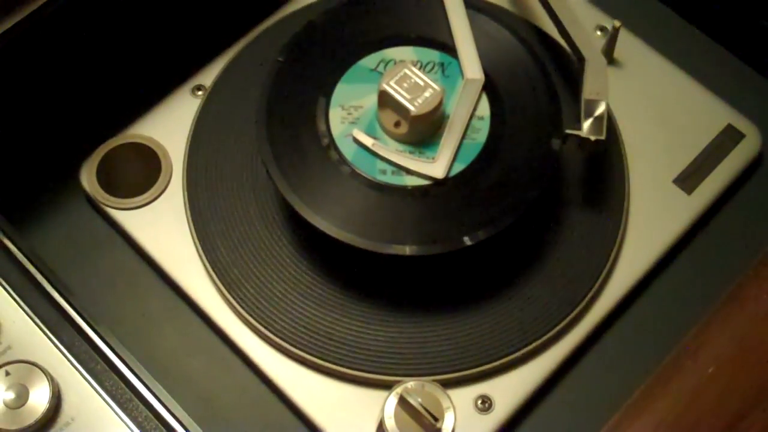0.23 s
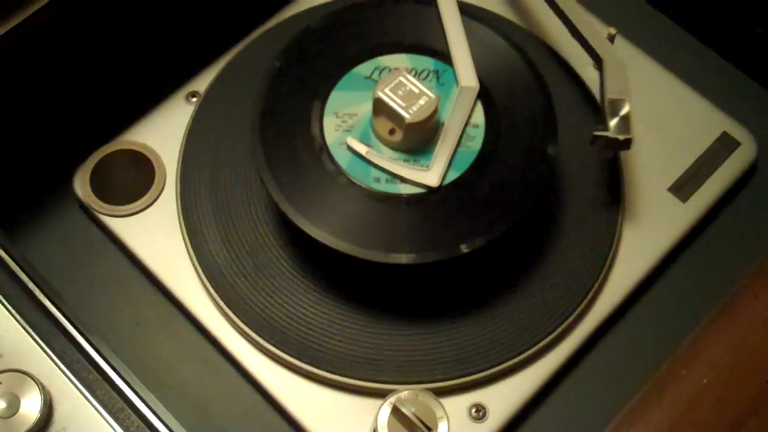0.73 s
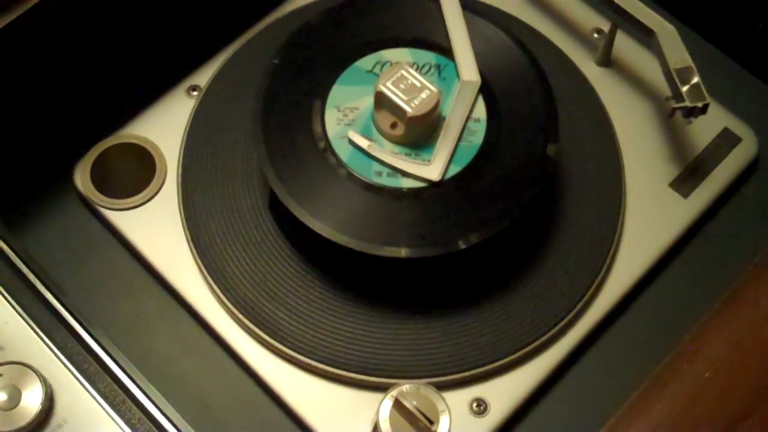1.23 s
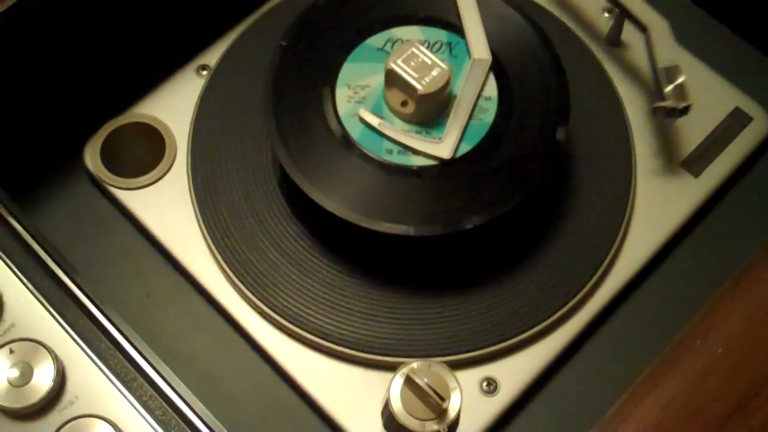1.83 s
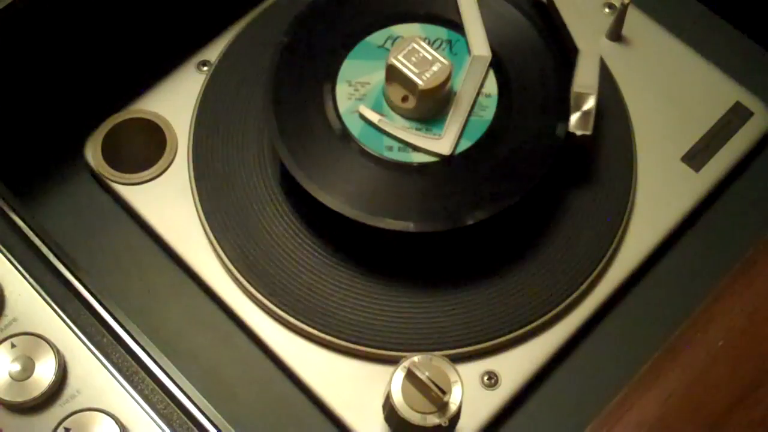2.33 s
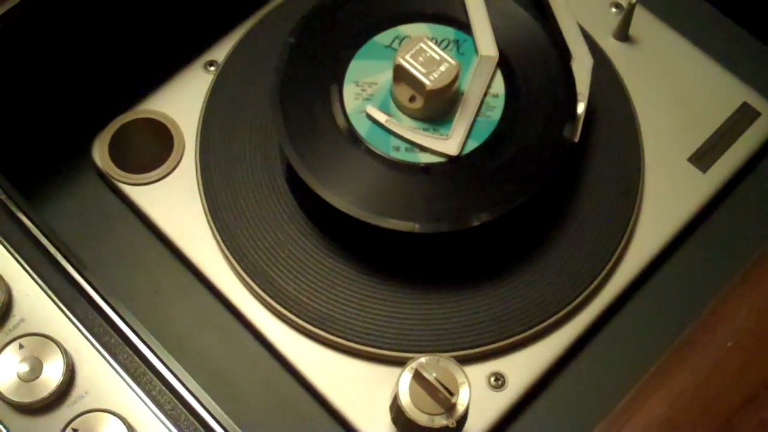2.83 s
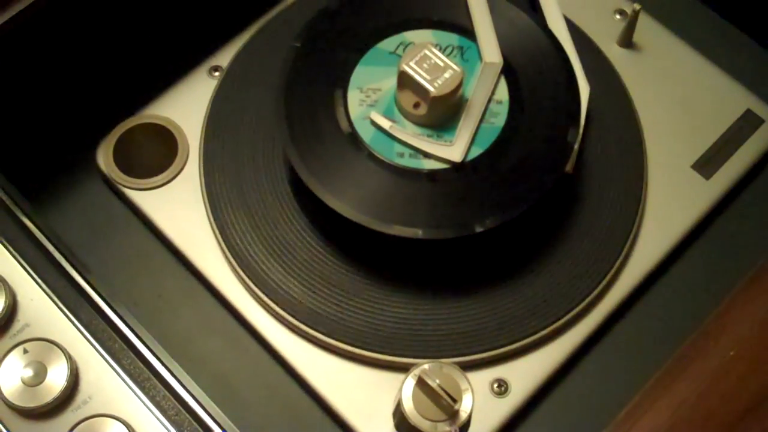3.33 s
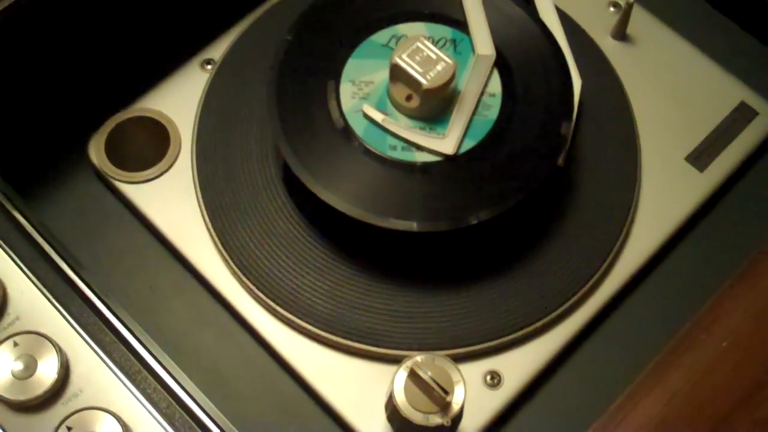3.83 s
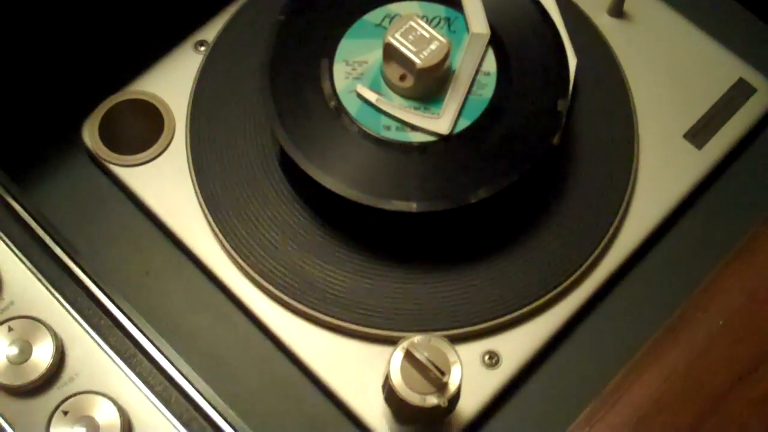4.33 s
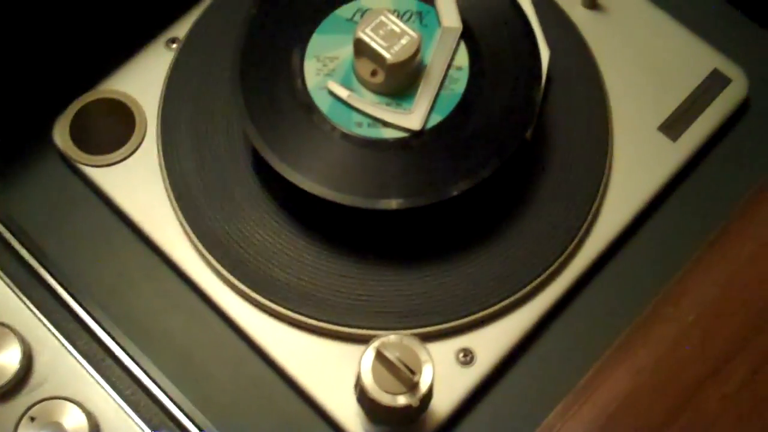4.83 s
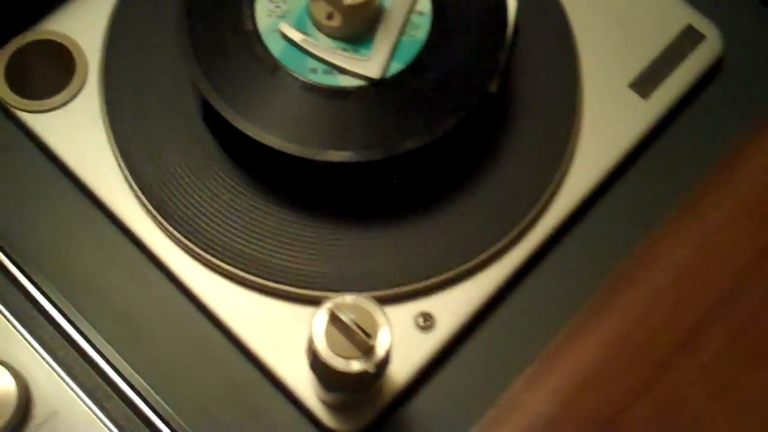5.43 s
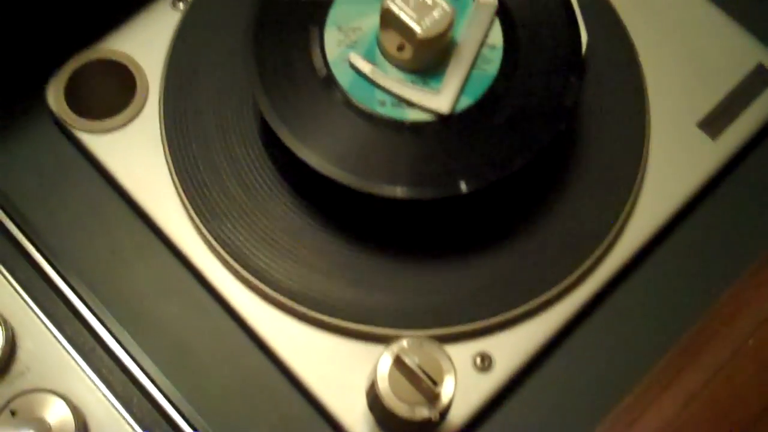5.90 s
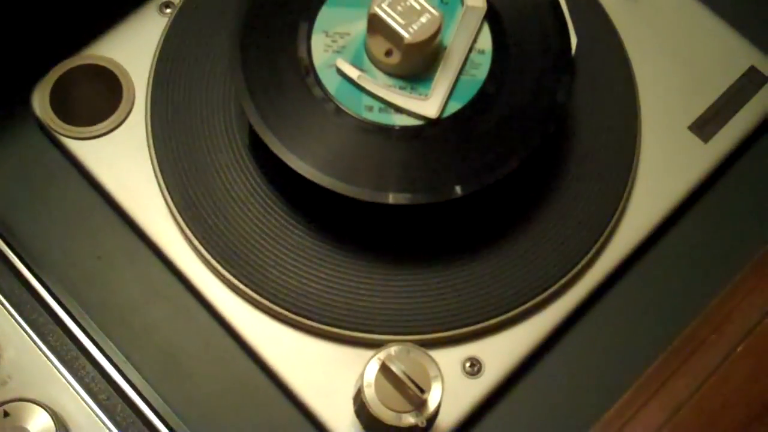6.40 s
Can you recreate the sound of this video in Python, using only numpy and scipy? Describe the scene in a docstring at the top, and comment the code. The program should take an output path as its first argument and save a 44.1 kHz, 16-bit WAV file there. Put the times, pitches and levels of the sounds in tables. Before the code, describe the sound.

Close up, a record changer clicks and scrapes through its cycle, snapping and clunking heavily, then settles into quiet motor hum and whirr.

```python
"""First heard are a low rumble, a motor hum and a grainy rub; then ticks, as a record changer starts its cycle.
It stands in a small furnished room, close to a stereo microphone. Rumble and rub are coloured noise,
the hum is a few wavering sines, and buzz and whirr are resonances that swell with a 45 rpm platter.
Levers tick, scrape and snap: each blow is a burst of chatter that sets steel deck, lever and cabinet ringing.
Late in the cycle the sprung chassis thumps softly in decaying low sines."""
import sys
import numpy as np
from scipy import signal
from scipy.fft import rfft, irfft, next_fast_len
from scipy.io import wavfile
from scipy.ndimage import uniform_filter1d

SR = 44100
rng = np.random.default_rng(int(sys.argv[2]) if len(sys.argv) > 2 else 0)


def dump_mix(stems):
    """Bounce the given channels to the path in sys.argv[1] as a 16-bit WAV at rate SR."""
    frames = np.atleast_2d(stems).T  # one column per channel
    limited = np.clip(frames, -1, 1)  # hard clip at full scale
    pcm = np.round(limited * 32767).astype(np.int16)
    wavfile.write(sys.argv[1], SR, pcm)


N = 293697
TIME = np.arange(N) / SR
TURN_S = 60 / 45  # one turn of the platter
CYCLE_END_S = 4.7


def amp(db):
    """Decibels to an amplitude factor."""
    return 10 ** (np.asarray(db) / 20)


def evened(x):
    """Scale to an rms of 1."""
    return x / np.sqrt(np.mean(x ** 2) + 1e-20)


def read(points, hz):
    """A spectrum table, joined by straight lines on a log-frequency axis."""
    f, value = np.transpose(points)
    return np.interp(np.log(hz + 1), np.log(f + 1), value)


def add(mix, s, sound):
    """Mix a sound in at s seconds, cut off at the end."""
    part = mix[..., round(s * SR):][..., :sound.shape[-1]]
    part += sound[..., :part.shape[-1]]


def swell(period, peak_s):
    """A rise and fall between -1 and 1 that repeats as the platter turns."""
    return np.cos(2 * np.pi * (TIME - peak_s) / period)


def drift(count):
    """Slow chance, drawn anew at evenly spaced moments."""
    return np.interp(TIME, np.linspace(0, TIME[-1], count), rng.standard_normal(count))


def microphone_ports(z, hz, likeness, balance):
    """Two unrelated spectra become a partly alike left and right of the same total power."""
    same = np.clip(read(likeness, hz), 0, 1)
    lean = amp(read(balance, hz))
    left = lean * z[0]
    right = same * z[0] + np.sqrt(1 - same ** 2) * z[1]
    return np.array([left, right]) * np.sqrt(2 / (1 + lean ** 2))


def noise(colour, likeness, balance):
    """Steady stereo noise of rms 1."""
    hz = np.fft.rfftfreq(N, 1 / SR)
    z = microphone_ports(rfft(rng.standard_normal((2, N))), hz, likeness, balance)
    return evened(irfft(z * amp(read(colour, hz)), N))


def resonate(x, modes):
    """Steep resonances (f/Hz, single-pass width/Hz, level/dB), each passed twice; the sum has rms 1."""
    size = next_fast_len(N)
    hz = np.fft.rfftfreq(size, 1 / SR)
    body = sum(amp(db) / (1 + 2j * (hz - f) / width) ** 2 for f, width, db in modes)
    return evened(irfft(rfft(x, size) * body, size)[..., :N])


# spectrum of the rumble: f/Hz, relative level/dB per Hz
RUMBLE_COLOUR = [(20, -16), (40, -16), (62, -2), (88, -16.5), (120, -2.5), (200, -6), (290, -3), (400, -5),
                 (600, -7.5), (1200, -9.5), (2300, -14), (4400, -19.5), (7000, -16), (9000, -24),
                 (14000, -27.5)]
# how alike the rumble is at the two microphone ports: f/Hz, likeness 0-1
RUMBLE_LIKENESS = [(30, .4), (60, .67), (130, 0.68), (280, .94), (610, 0.78), (1330, 0.48), (2880, 0.12),
                   (6250, 0.083)]
# lean of the rumble between the ports: f/Hz, left over right level/dB
RUMBLE_BALANCE = [(40, -4), (110, -2.5), (670, -.5), (7400, 0)]


def rumble(level_db=-54):
    """Steady broad rumble under the platter: coloured noise, partly alike at the two ports."""
    return amp(level_db) * noise(RUMBLE_COLOUR, RUMBLE_LIKENESS, RUMBLE_BALANCE)


# motor lines: f/Hz, rms level/dB before the common trim
HUM_LINES = [(59, -77.5), (119.7, -70), (241, -68.5), (290, -68), (410, -66)]


def hum(waver=.004, trim_db=-3.0):
    """Motor lines as sines whose pitches waver together by chance."""
    speed = 1 + waver * drift(count=60)
    elapsed = np.cumsum(speed) / SR
    out = 0
    for hz, db in HUM_LINES:
        line = np.sin(2 * np.pi * (hz * elapsed + rng.random()))
        out = out + amp(db + trim_db) * np.sqrt(2) * line
    return out


# rubbing of the cam: t/s, level/dB before the trim
CAM_LEVEL = [(0.0, -60), (0.8, -64), (0.92, -63), (1.49, -67.5), (1.81, -61), (2.13, -51.5), (2.21, -54),
             (2.37, -62), (2.84, -75), (3.32, -74.5), (3.82, -59), (4.2, -62.5), (4.48, -67), (4.7, -79)]
# spectrum of the rubbing: f/Hz, relative level/dB per Hz
CAM_COLOUR = [(200, -13), (600, 3), (1600, -4.5), (4000, -2.5), (6000, -6.5), (7700, 7.5), (9500, -10),
              (14000, -31.5)]
# how alike the mechanism is at the two microphone ports: f/Hz, likeness 0-1
HIT_LIKENESS = [(200, 1), (2000, 0.95), (4000, 0.95), (7000, 0.5), (9000, 0.97), (13000, .3)]
# lean of the mechanism between the ports: f/Hz, left over right level/dB
HIT_BALANCE = [(200, -0.8), (1100, -1.5), (2200, -1), (4200, 0), (6000, -6.5), (6800, -3), (7400, 8),
               (8300, 11.5), (11000, 10.5), (13800, 17)]


def cam(grain_db=2.0, trim_db=1.5, stop_db_per_s=87):
    """Grainy rubbing of the cam while the cycle runs: noise roughened by fast level changes."""
    slow_noise = evened(uniform_filter1d(rng.standard_normal(N), size=180))
    grain = evened(amp(grain_db * slow_noise))
    level_db = trim_db + np.interp(TIME, *np.transpose(CAM_LEVEL))
    level_db -= stop_db_per_s * np.maximum(TIME - CYCLE_END_S, 0)
    return noise(CAM_COLOUR, HIT_LIKENESS, HIT_BALANCE) * grain * amp(level_db)


# loose parts near the motor: f/Hz, single-pass width/Hz, rms level/dB before swell and drift, swell peak t/s
BUZZ_MODES = [(6000, 360, -88.5, 5.1), (6775, 410, -69, 5.1), (8100, 600, -72, 5.55)]


def buzz(mains_hz=60, rough=.4, swell_db=2, drift_db=2.5):
    """Loose parts are tapped at each half cycle of the mains, to and fro, and buzz most once a turn."""
    swing = np.sin(2 * np.pi * mains_hz * TIME)
    taps = evened(np.diff(np.tanh(swing * 150), prepend=0))
    paths = rng.standard_normal((2, 500)) / np.sqrt(500)  # the taps reach the air by many paths
    drive = signal.fftconvolve(taps[None], paths, axes=1)[:, :N]
    drive += rough * rng.standard_normal((2, N))
    out = np.zeros((2, N))
    for hz, width, db, peak_s in BUZZ_MODES:
        level_db = db + swell_db * swell(TURN_S, peak_s) + drift_db * drift(count=30)
        out += resonate(drive, [(hz, width, 0)]) * amp(level_db)
    return out


# resonances of the drive wheel: f/Hz, single-pass width/Hz, relative level/dB
WHIRR_MODES = [(693, 85, -2.5), (800, 40, -3), (1243, 50, -1), (1400, 25, 3), (1830, 1400, -13),
               (2780, 680, -18.5)]


def whirr(base_db=-70, free_db=1.5, swell_db=3.5, peak_s=5.64, flutter_db=2.2):
    """The rubber drive wheel rolls unevenly inside the platter: resonant noise that flutters."""
    free = np.clip((TIME - CYCLE_END_S) / 0.27, 0, 1)  # the cam lets go of the drive
    level_db = base_db + free * (free_db + swell_db * swell(TURN_S / 2, peak_s))
    level_db += flutter_db * drift(count=90)
    return resonate(rng.standard_normal(N), WHIRR_MODES) * amp(level_db)


def causal(gain):
    """The minimum-phase response with this gain: nothing sounds before the blow."""
    log_gain = np.log(np.maximum(gain, 1e-6))
    circle = np.concatenate([log_gain, log_gain[-2:0:-1]])
    return np.exp(np.conj(signal.hilbert(circle)))[:len(gain)]


# colour of a blow on the deck: f/Hz, relative level/dB per Hz
DECK_COLOUR = [(60, -58.5), (140, -39.5), (230, -11), (330, -14), (480, -6), (750, -3), (1150, -2),
               (1800, -1.5), (3000, 1.5), (3800, -3), (5400, 1.5), (6200, -0.5), (7500, 3.5), (9500, -11),
               (13500, -26.5)]
# phase between the microphone ports: f/Hz, radians by which left leads
HIT_PHASE = [(500, 0), (2000, -.1), (3500, -.4), (5000, -1), (6200, -.5), (7200, .2), (8500, -.8),
             (12000, -1.6)]


def contact(length, part_hz, click_db, thud_db, knock_db, tick_db, chatter_db=2.5, release=0.0018, sag_db=2.0,
            part_db=10.0, part_width=720.0, ripple_db=3.5, size=4096):
    """Metal chatters on metal for a moment; hard contacts tick, heavy ones knock and thud."""
    t, hz = np.arange(size) / SR, np.fft.rfftfreq(size, 1 / SR)
    roughness = evened(uniform_filter1d(rng.standard_normal(size), size=40))
    sag = amp(-sag_db * np.minimum(t / length, 1))
    let_go = np.exp(-np.maximum(t - length, 0) / release)
    force = amp(chatter_db * roughness) * sag * let_go
    z = rfft(force * rng.standard_normal((2, size)))
    z /= np.sqrt(uniform_filter1d(abs(z) ** 2, size=110, axis=1))  # every contact excites all bands
    z /= abs(z) ** (1 / (1 + (hz / 1200) ** 2))  # to the low notes the chatter is one even push
    hardness = [(600, thud_db), (1400, knock_db), (3600, knock_db), (5400, 0.0031), (8200, 0), (11000, tick_db)]
    # each small part has one strong resonance and many lesser ones
    ripple = uniform_filter1d(rng.standard_normal(len(hz)), size=22)
    ripple = evened(uniform_filter1d(ripple, size=14))
    part = part_db / (1 + ((hz - part_hz) / part_width) ** 2)
    part += ripple_db * ripple * np.minimum(hz / 2000, 1)
    gain = evened(amp(read(DECK_COLOUR, hz) + part)) * amp(click_db + read(hardness, hz))
    z = microphone_ports(z, hz, HIT_LIKENESS, HIT_BALANCE) * causal(gain)
    z[1] *= np.exp(-1j * read(HIT_PHASE, hz))
    return irfft(z)[:, :size * 3 // 4]


def ring(push, modes, width_hz=5.):
    """Each push adds energy to every mode, which drains away at the mode's own rate."""
    energy = signal.lfilter(np.ones(130) / 130, 1, push ** 2)  # the ring takes a moment to spread
    out = np.zeros(N)
    for hz, db, t60 in modes:
        damping = np.log(1000) / t60 / SR
        stored = signal.lfilter([1], [1, -np.exp(-2 * damping)], energy + 1e-20)
        swing = 2 * damping * np.sqrt(stored)
        # moving parts lean on the metal, so the pitch wanders a little
        wander = np.cumsum(rng.standard_normal(N)) * np.sqrt(2 * np.pi * width_hz / SR)
        out += amp(db) * swing * np.sin(2 * np.pi * hz * TIME + wander)
    return out


# decay of the furnished room: f/Hz, t60/s
ROOM_DECAY = [(200, .34), (700, 0.089), (2000, 0.17), (5000, 0.17), (8000, 0.14), (13000, 0.27)]


def room(x, cabinet_db=-10.0, cabinet_t60=0.02, room_db=-12.0, onset=0.012):
    """Quick echoes from the cabinet, then the short tail of a furnished room, as decaying noise."""
    hz, t, z = signal.stft(rng.standard_normal((2, SR // 2)), SR, nperseg=128)
    same = np.clip(read(HIT_LIKENESS, hz), 0, 1)[:, None] ** 2
    z[1] = same * z[0] + np.sqrt(1 - same ** 2) * z[1]
    cabinet_echo = (cabinet_db, cabinet_t60, z[..., ::-1])
    room_tail = (room_db, read(ROOM_DECAY, hz)[:, None], z)
    response = 0
    for db, t60, taps in [cabinet_echo, room_tail]:
        tail = signal.istft(taps * np.exp(-np.log(1000) * t / t60), SR, nperseg=128)[1]
        tail *= np.minimum(np.arange(tail.shape[1]) / SR / onset, 1) ** 2
        response = response + amp(db) * tail / np.linalg.norm(tail[0])
    return x + signal.fftconvolve(x, response, axes=1)[:, :N]


# Every blow is t/s, contact length/s, struck part f/Hz, click level/dB, weight level/dB;
# weight adds body and ring under the click.
def stray_ticks(per_s=4, level_db=-32.5, length=.006, part_hz=7300., spread_hz=700., spread_db=5.0):
    """Faint ticks at random moments, stirred by the cam as it turns until the cycle ends."""
    blows = []
    for when, pitch, force in rng.random((round(per_s * CYCLE_END_S), 3)):
        hz = part_hz + spread_hz * (2 * pitch - 1)
        db = level_db + spread_db * (2 * force - 1)
        blows.append((when * CYCLE_END_S, length, hz, db, 0))
    return blows


def judder(start_s=.124, gap_s=.029, level_db=-36, fall_db=2.2, count=3, length=.009, part_hz=1530.):
    """The long lever judders as the cam first takes it up: evenly spaced dull taps that die away."""
    return [(start_s + k * gap_s, length, part_hz, level_db - k * fall_db, 0) for k in range(count)]


# rebounds of the heaviest clunk: t/s
REBOUND_TIMES = [2.1613, 2.178, 2.232, 2.289, 2.32, 2.367]


def rebounds(level_db=12.5, fall_db_per_s=148, dulling_db_per_s=30.5, length=.0035, part_hz=1300., weight_db=-5.0):
    """The heaviest clunk bounces; each rebound is weaker and duller than the one before."""
    blows = []
    for s in REBOUND_TIMES:
        since = s - REBOUND_TIMES[0]
        click_db = level_db - fall_db_per_s * since
        blows.append((s, length, part_hz, click_db, weight_db + dulling_db_per_s * since))
    return blows


# Blow tables, all: t/s, contact length/s, struck part f/Hz, click level/dB, weight level/dB
# light pawls ticking over the cam
TICKS = [(0.011, 0.0097, 8300, -22.5, -11), (0.085, .0056, 8200, -14.5, 5),
         (0.487, 0.0028, 8100, -23.5, -5), (0.832, .005, 6630, -17.5, 3), (.8491, 0.0095, 6440, -0.5, 1.5),
         (0.9405, .003, 7280, -13, 6.5), (.961, 0.0034, 8650, -9, 7.5), (1.746, 0.004, 7800, -22, 7),
         (1.9275, 0.0064, 7730, 11.5, 0), (2.009, .004, 8040, -20, 7), (2.378, 0.0086, 8400, -19.5, -17),
         (2.557, 0.02, 7260, -21.5, -6), (2.818, .006, 8450, -26.5, -13), (3.366, 0.0062, 7140, -7, -15),
         (3.381, 0.0037, 6900, -11, -7), (3.435, .002, 6800, -23.5, -7), (3.627, 0.036, 6650, -5, 1.5),
         (3.739, 0.0062, 8100, -19.5, -9), (3.954, .0046, 7060, -12.5, -10), (4.024, 0.014, 6580, -12, 1),
         (4.215, 0.0059, 8600, -22.5, -18), (4.291, .003, 6700, -21, 6.5), (4.491, 0.003, 8300, 10, 4),
         (4.534, 0.0041, 7660, 2.5, -1), (4.66, 0.0056, 7700, -25, -7)]
# sprung latches snapping over
SNAPS = [(0.069, .0087, 2660, -15.5, -6.5), (.878, .005, 6460, 5, -1), (0.894, .0047, 7100, -2.5, -0.5),
         (.899, .0035, 2910, -0.5, -5.5), (0.9878, 0.0039, 4700, 12.5, 1.5), (.992, .0045, 2900, 10, 2.5),
         (1.0073, 0.0055, 7480, 17, 1), (1.0204, .0035, 6140, 8, -3), (1.8002, .0064, 6300, -16, -3),
         (2.089, .012, 7560, -1, -4), (2.1343, .005, 8160, 18.5, -3), (2.216, .009, 7340, -12.5, 11.5),
         (4.351, .0068, 4370, -5, -2.5)]
# knocks on the long lever
LEVER_KNOCKS = [(0.223, 0.019, 3270, -23, -0.5), (1.113, 0.0039, 4280, -26.5, 0),
                (1.455, 0.0048, 4300, -23, 7.5), (2.714, 0.0093, 2800, -20.5, 8.5),
                (4.3586, 0.002, 4210, 2, -4), (4.367, .015, 2200, -5, -4.5)]
# the tone arm's linkage meeting its stops
STOPS = [(.251, .0061, 5360, -7.5, 1.5), (.275, 0.026, 7150, -24, 6), (.421, .0046, 6100, -14.5, 2.5),
         (.859, .011, 7700, 0.5, 0.5), (1.238, .006, 5580, -10.5, -0.5), (1.259, .0031, 5400, -14, 0),
         (1.808, .017, 1530, -23.5, 9), (2.706, .0062, 7700, -5, -1.5), (3.663, 0.0066, 2400, -4, -2)]
# the heavy landing on the deck plate
CLUNKS = [(2.1036, .008, 1460, 9, -4.52), (2.119, .015, 1420, 3, 1), (2.141, 0.012, 1300, 18.5, -3.1)]
# parts sliding home as the cycle ends
SCRAPES = [(4.385, 0.028, 7690, -9.5, 3.5), (4.424, 0.0092, 7600, -10.5, 1), (4.45, 0.019, 3300, -2.5, 0),
           (4.47, 0.0094, 3240, -5.5, 4), (4.482, 0.018, 8600, 5, -1.5), (4.509, 0.022, 8140, -5.5, 3),
           (4.574, 0.0236, 2060, -13.5, 5)]
# Kinds of blow, all relative to the click: thud level/dB, knock level/dB, tick level/dB,
# push on deck level/dB, push on lever level/dB, push on cabinet level/dB
# a light pawl
PAWL = (-11, -8, 7.5, -18, -30.5, -31.5)
# a sprung latch
LATCH = (-3.5, 1.5, -1, -19, -18, -12.5)
# a stop of the tone arm's linkage
STOP = (6, -3, 0, -1, 2.5, -19.5)
# a landing on the deck plate
DECK = (-0.5, -1, -2, 3, -5.5, -20.5)
# a knock on the long lever
LEVER = (-1, 2.5, -7.5, -22, 6, -5)
# a tap of the juddering lever
JUDDER = (20, 18, 6, -3, 29, -10)
# a part sliding home
SLIDE = (7, -3.5, 5, -12, -3, -14)
# steel deck plate: f/Hz, resonance level/dB, t60/s
DECK_MODES = [(409, -2, .3), (517, 10, .6), (953, 3, .35), (1035, 7, .3), (1103, 13, .28), (1147, 16, .32),
              (1366, 9, .2), (1397, 9, .2), (1590, 6, .2), (1663, 8, .2), (1780, 8, .22), (1885, 10, .2),
              (2164, 3, .28), (2414, 9, .22), (2820, 4, .2), (3268, 7, .18), (3365, 3, .2), (3640, 3, .15),
              (4778, 4, .2), (5435, 5, .2), (6762, 7, .25), (7050, 6, .25), (7397, 4, .25), (7680, 7, .25)]
# long steel lever: f/Hz, resonance level/dB, t60/s
LEVER_MODES = [(640, 3, .17), (1030, 1, .15), (1551, 13, .35), (2270, 2, .12), (2634, 6, .1),
               (2880, 2, .15), (3252, 6, .13), (3420, 7, .1), (3640, 4, .1), (4290, 4, .06)]
# cabinet: f/Hz, resonance level/dB, t60/s
CABINET_MODES = [(177, -5.5, 0.37), (243, 3, 0.042), (393, 10.5, 0.083), (470, 7, .09), (575, 12.5, .16)]


def mechanism(dulling=.3):
    """Every blow clicks, and pushes the deck plate, the long lever and the cabinet into ringing."""
    kinds = [(PAWL, TICKS + stray_ticks()), (LATCH, SNAPS), (STOP, STOPS), (DECK, CLUNKS + rebounds()),
             (LEVER, LEVER_KNOCKS), (JUDDER, judder()), (SLIDE, SCRAPES)]
    clicks, pushes = np.zeros((2, N)), np.zeros((3, N))
    for (thud_db, knock_db, tick_db, *push_db), blows in kinds:
        for s, length, part_hz, click_db, weight_db in blows:
            click = contact(max(length, 1e-3), part_hz, click_db, thud_db + weight_db,
                            knock_db + weight_db, tick_db - dulling * weight_db)
            add(clicks, s, click)
            add(pushes, s, amp(click_db + weight_db) * amp(push_db)[:, None])
    bodies = [DECK_MODES, LEVER_MODES, CABINET_MODES]
    return room(clicks) + sum(ring(push, modes) for push, modes in zip(pushes, bodies))


# sway of the sprung chassis: t/s, level/dB before the soft onset, f/Hz, t60/s
THUMPS = [(4.37, -49.5, 85.5, 0.2), (4.485, -34, 143, 0.12), (4.49, -45, 80, 0.27),
          (4.605, -47, 73.3, 0.23)]


def chassis(rise=.01):
    """Soft low thumps of the deck on its springs: decaying sines with a soft onset."""
    out, t = np.zeros(N), np.arange(SR // 2) / SR
    for s, db, hz, t60 in THUMPS:
        envelope = (1 - np.exp(-t / rise)) * np.exp(-np.log(1000) * t / t60)
        add(out, s, amp(db) * envelope * np.sin(2 * np.pi * hz * t))
    return out


def scene():
    """All sources together at the stereo microphone."""
    return rumble() + hum() + cam() + buzz() + whirr() + mechanism() + chassis()


def record(dry, edge_hz=14300):
    """The microphone input clips at full scale; then a low-pass limits the band."""
    clipped = np.clip(dry, -1, 1)
    low_pass = signal.firwin(255, edge_hz, window=("kaiser", 7), fs=SR)
    return signal.oaconvolve(clipped, low_pass[None], "same")


dry = scene()
out = record(dry)
dump_mix(out)
```